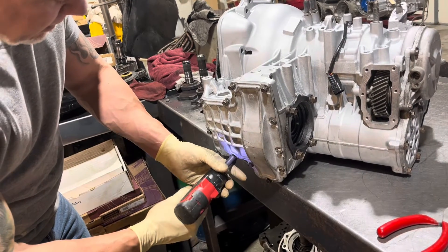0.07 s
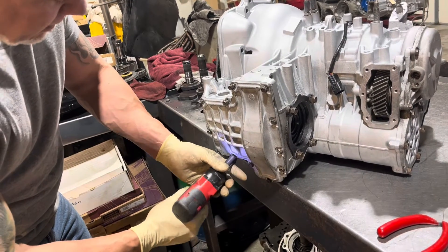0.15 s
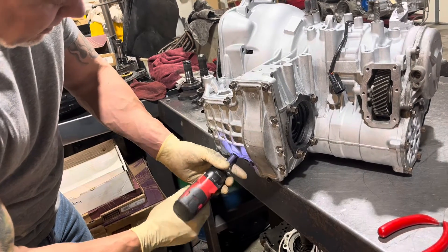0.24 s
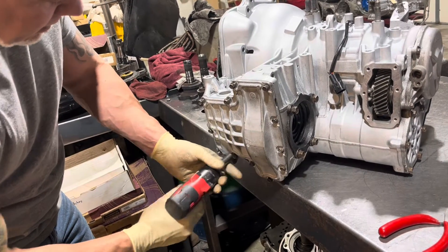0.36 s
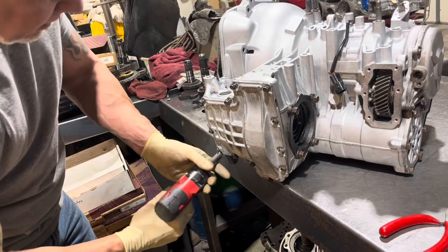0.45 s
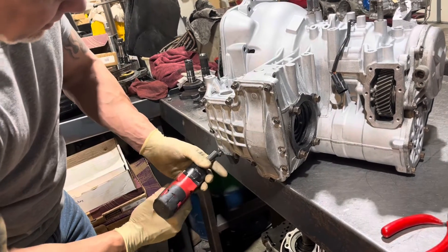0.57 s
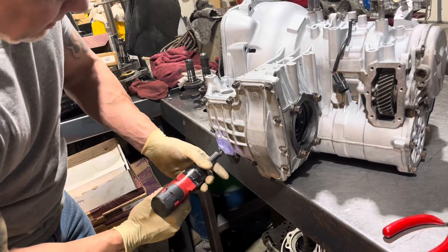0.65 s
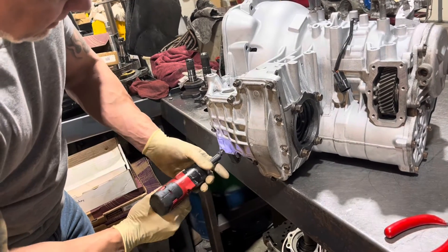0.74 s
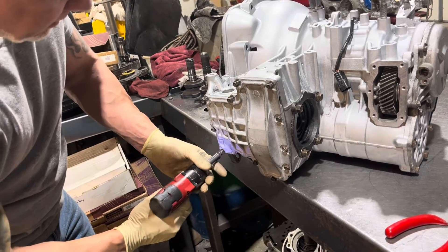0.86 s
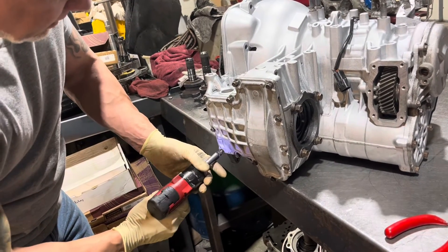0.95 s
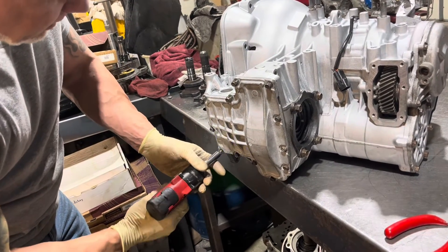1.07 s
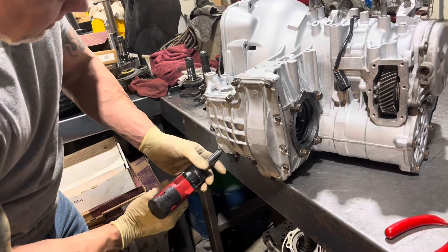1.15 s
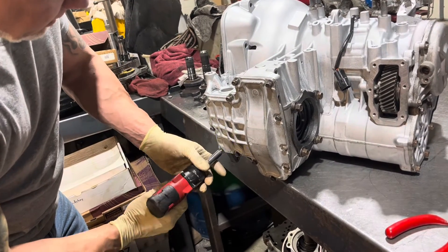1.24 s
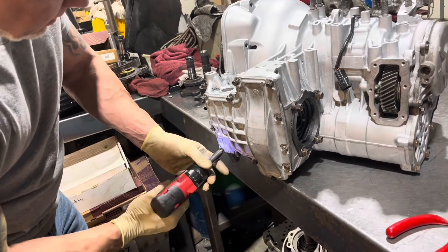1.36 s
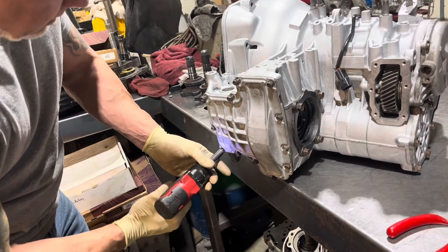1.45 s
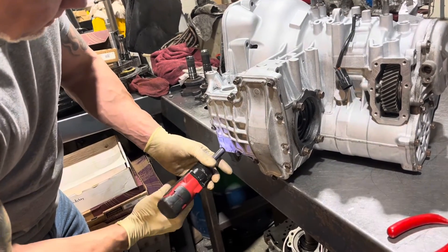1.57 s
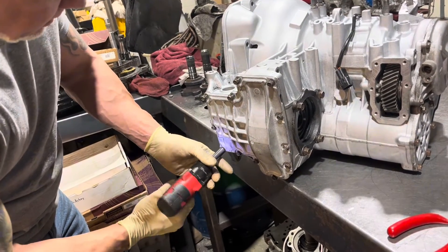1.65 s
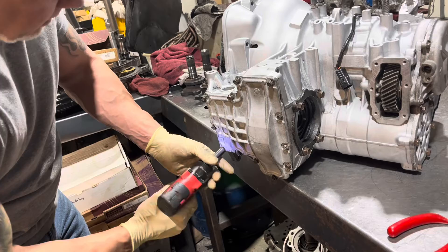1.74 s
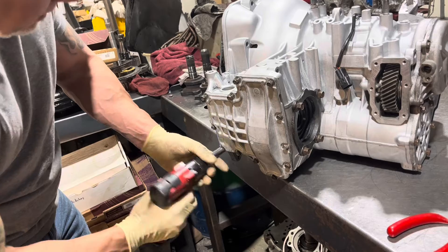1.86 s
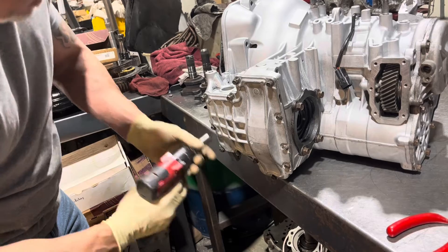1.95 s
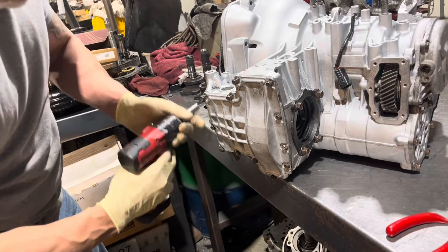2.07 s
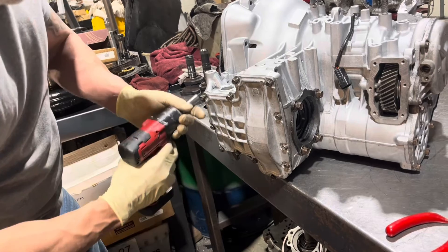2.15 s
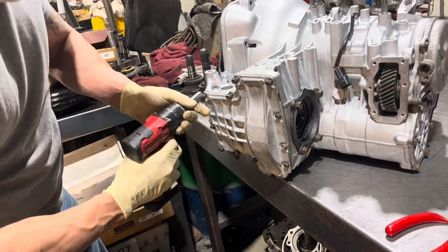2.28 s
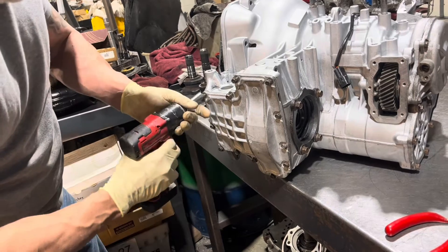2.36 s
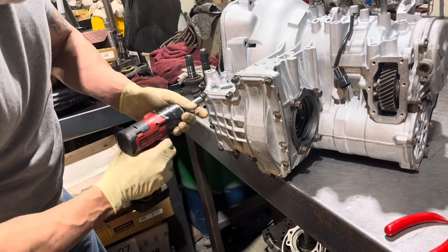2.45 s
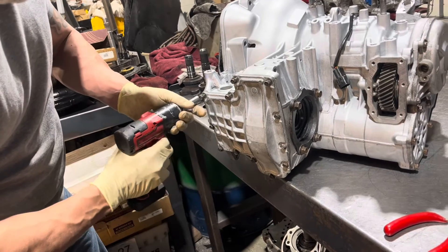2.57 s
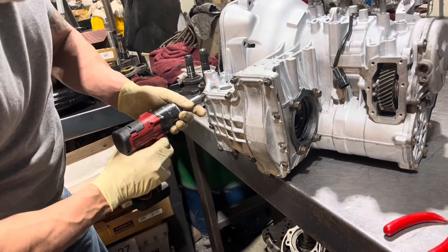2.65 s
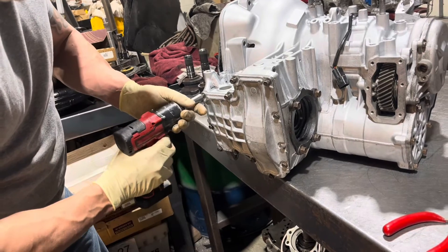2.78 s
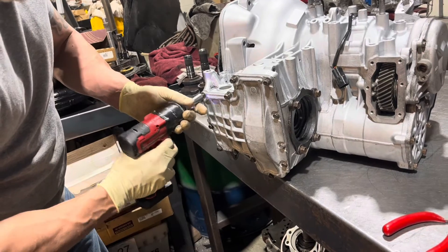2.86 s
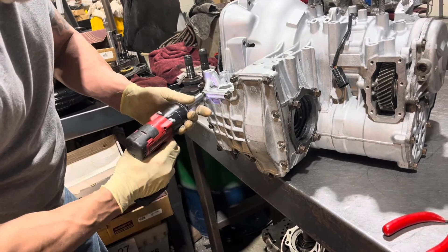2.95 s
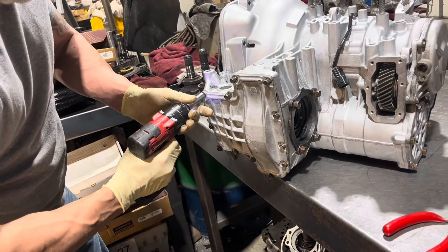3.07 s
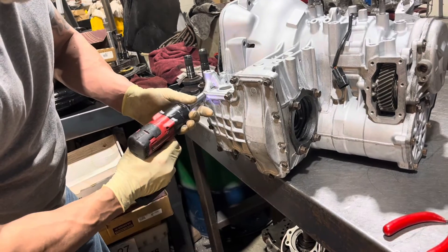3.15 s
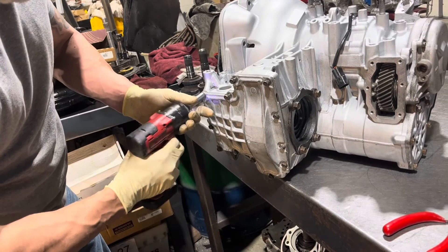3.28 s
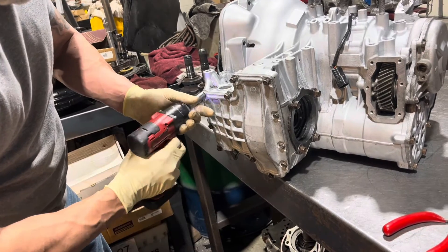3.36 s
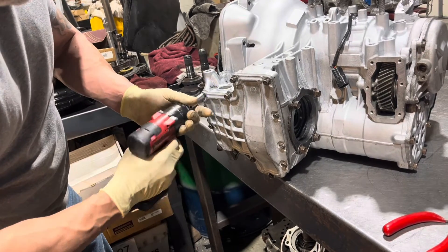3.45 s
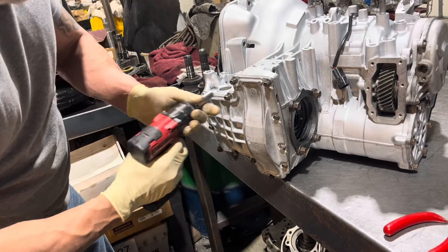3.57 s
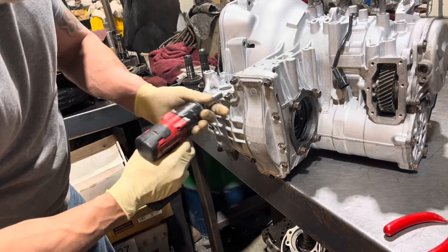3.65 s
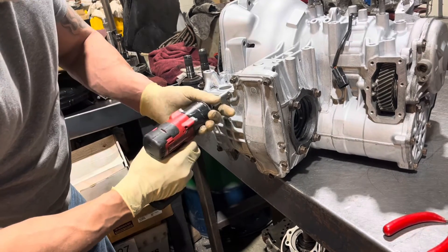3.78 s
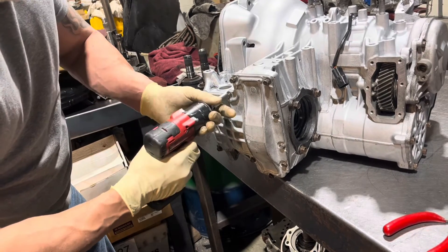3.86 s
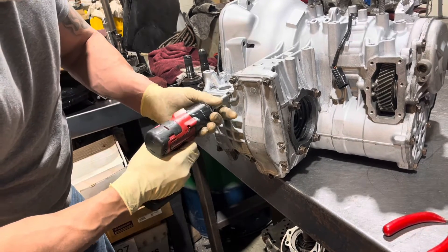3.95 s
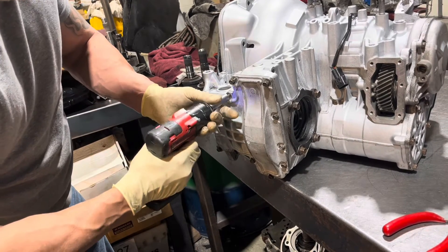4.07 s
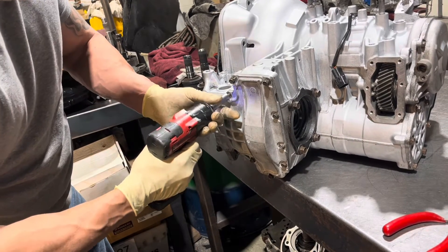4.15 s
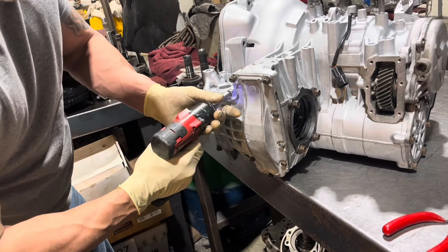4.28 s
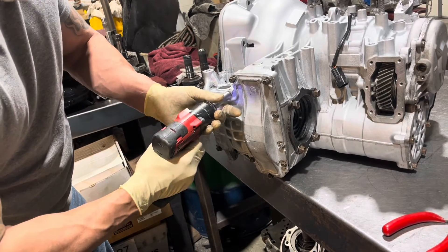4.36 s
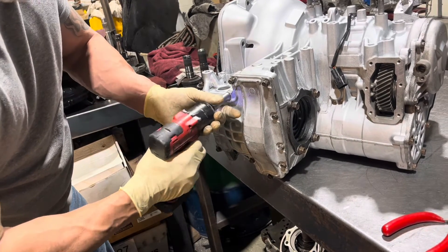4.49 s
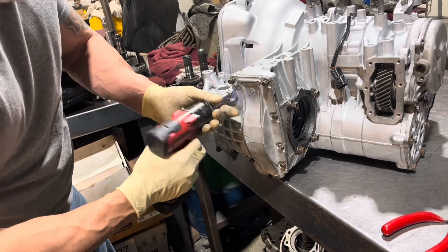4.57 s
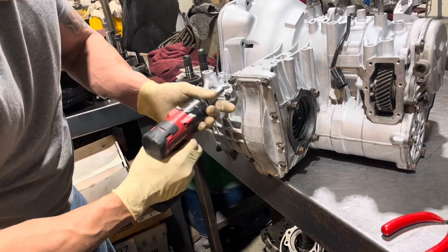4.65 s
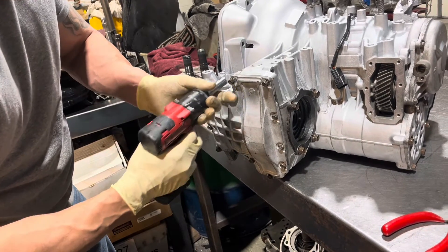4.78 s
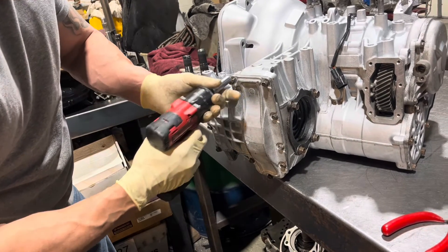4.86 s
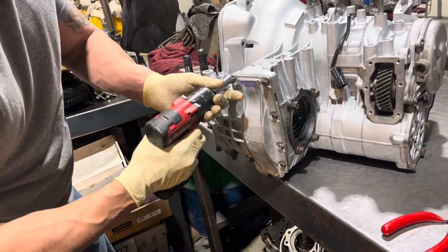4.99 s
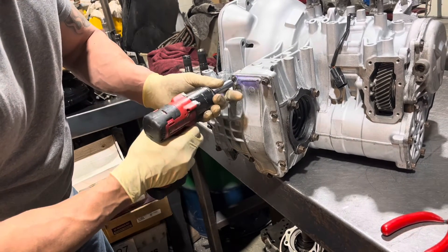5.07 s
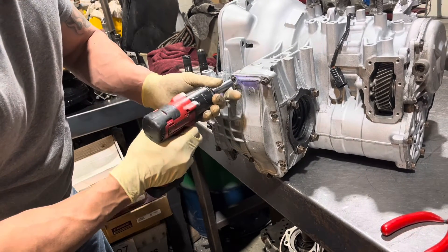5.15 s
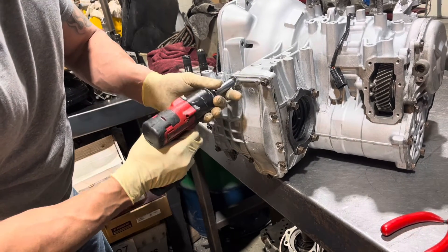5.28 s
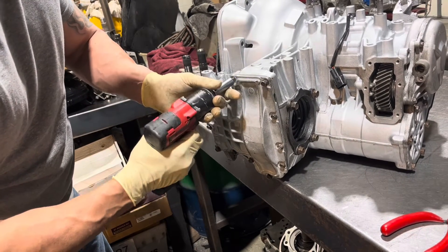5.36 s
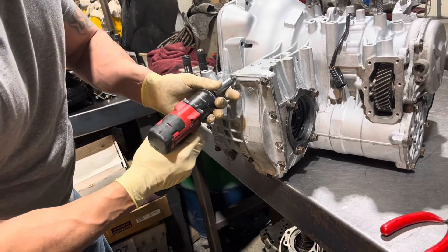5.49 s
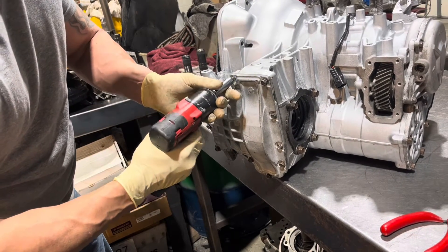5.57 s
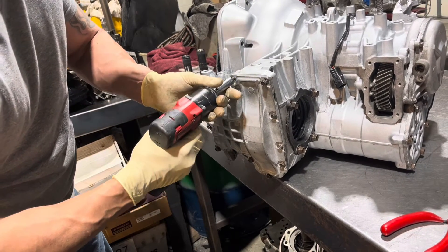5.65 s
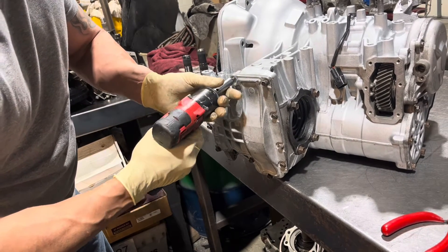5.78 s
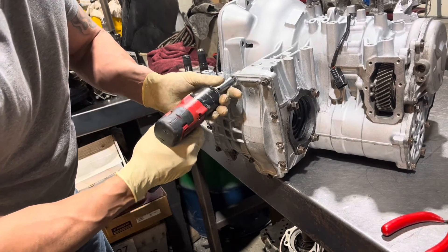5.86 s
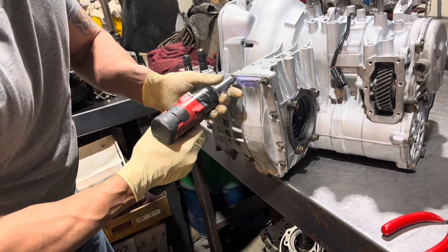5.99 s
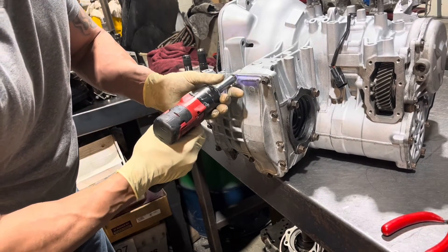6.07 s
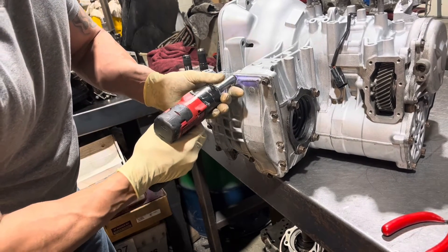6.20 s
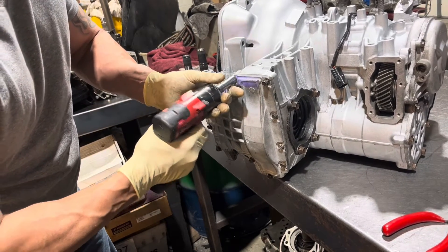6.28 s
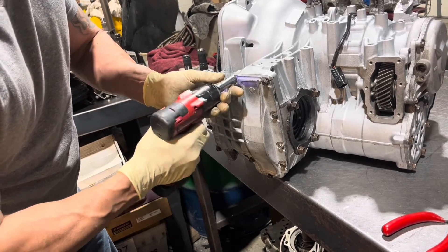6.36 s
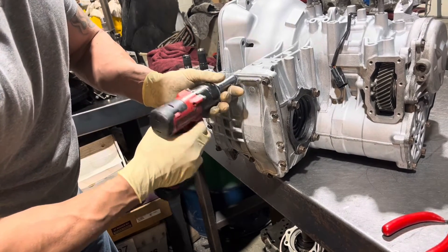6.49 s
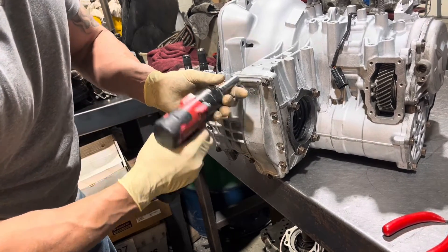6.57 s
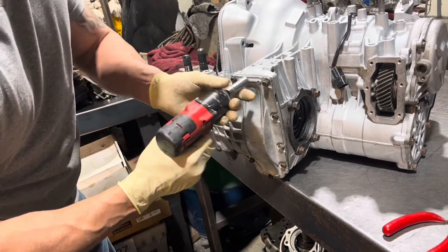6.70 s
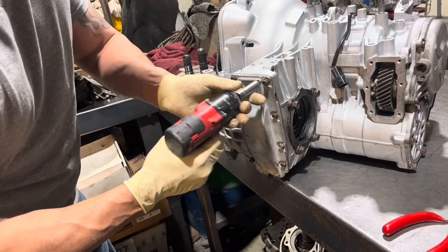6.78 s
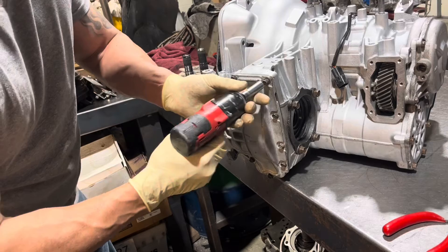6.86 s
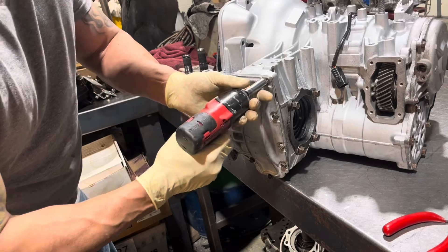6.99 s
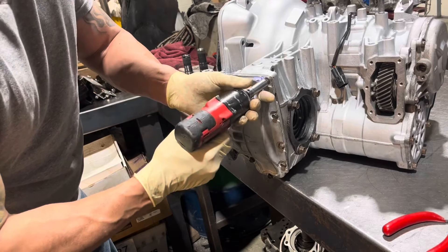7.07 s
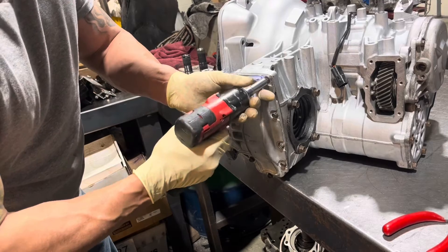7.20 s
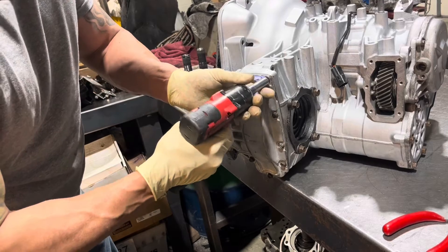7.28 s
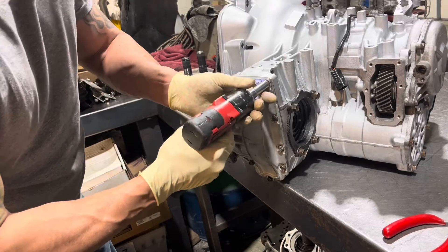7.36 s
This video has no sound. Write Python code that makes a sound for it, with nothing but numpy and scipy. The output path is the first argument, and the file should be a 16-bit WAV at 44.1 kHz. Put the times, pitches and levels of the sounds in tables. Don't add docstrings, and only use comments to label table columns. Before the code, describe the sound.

A battery ratchet is already whining, then rattles hard against a bolt. A softer whir rises and sags, and the tool drives four more bolts, each with a quick spin-up and a burst of fast, sharp metallic knocks that stops abruptly or slows briefly. Steel clicks, a socket rattle, bench thuds and a faint hum of the case fill the gaps. Close, slightly compressed phone pickup in a moderately live shop.

```python
import sys
import numpy as np
from scipy import signal
from scipy.fft import rfft, irfft
from scipy.io import wavfile
from scipy.ndimage import uniform_filter1d

SR = 44100
rng = np.random.default_rng(int(sys.argv[2]) if len(sys.argv) > 2 else 0)


def dump_mix(stems):
    frames = np.atleast_2d(stems).T
    limited = np.clip(frames, -1, 1)
    pcm = np.round(limited * 32767).astype(np.int16)
    wavfile.write(sys.argv[1], SR, pcm)


def volts(x):
    e = np.asarray(x, float) / 20
    return 10 ** e


N = 327663
TIME = np.arange(N) / SR
TOP_HZ = 15850
FULL_HZ = 900

# (time [s], rotor tone [Hz], strain [dB])
PULLED = [
    [(0, 800, -7), (0.105, 816, 2)],
    [(1.315, 200, -24), (1.4, 584, 0.5), (1.425, 745, 6), (1.46, 837, 1.5), (1.57, 910, 1),
     (1.645, 938, -5)],
    [(2.95, 810, -6.5), (3.01, 891, 4.5), (3.06, 949, -4.5), (3.19, 960, -13.5)],
    [(4.095, 220, -27.5), (4.15, 512, 2), (4.18, 789, 0), (4.21, 862, -5.5), (4.26, 934, -9),
     (4.41, 981, 0.5)],
    [(5.95, 220, -20.5), (6.0, 430, 2), (6.04, 597, 7.5), (6.09, 889, -8.5), (6.17, 952, -4),
     (6.265, 988, -7.5)],
]
# (time [s], rotor tone [Hz], strain [dB])
FEATHERED = [
    [(0.69, 200, -14.5), (0.75, 381.3, -2.5), (0.79, 526.5, -1.5), (0.83, 649.4, 0.5), (0.87, 704.2, -1),
     (0.95, 758, -4.5), (1.03, 696.2, -3.5), (1.075, 646.1, -9), (1.125, 582.7, -18)],
    [(2.37, 397.5, -25), (2.42, 598, -16), (2.45, 668, 1.5), (2.53, 468.9, -12), (2.645, 363.5, -7)],
    [(4.995, 203.9, -11), (5.1, 305.4, -2), (5.17, 341.3, 1), (5.27, 339.5, -12.5)],
    [(7.112, 247.7, -14), (7.2, 451.6, -1), (7.25, 544, -3), (7.33, 581.6, -6.5), (7.39, 625, -2),
     (7.43, 675.3, -3)],
]
SPEED = sorted(PULLED + FEATHERED)
# (first blow [s], blow rate [Hz])
BEATS = [
    (0.1164, 36.6),
    (1.6507, 43.6),
    (3.1992, 43.6),
    (4.4132, 43.7),
    (6.2738, 45.0),
]
# (trigger let go after [s], peak [dB], dying [dB/s])
BURSTS = [
    (0.13, -25, 163.5),
    (0.18, -25.5, 897),
    (.17, -24.5, 447.5),
    (0.16, -25.5, 250),
    (0.16, -24, 604),
]


def rms_one(x):
    return x / np.sqrt(np.mean(x ** 2) + 1e-20)


def column(tables, index):
    rows = np.vstack(tables)
    rows = rows[np.argsort(rows[:, 0])]
    return np.interp(TIME, rows[:, 0], rows[:, index])


def running(tables, edge_s):
    on = sum((TIME >= table[0][0]) & (TIME <= table[-1][0]) for table in tables)
    return uniform_filter1d(np.minimum(on, 1.), int(edge_s * SR) + 1, mode="nearest")


def colour(x, spectrum):
    size = 8192
    hz, db = np.transpose(spectrum)
    bins_hz = np.arange(size // 2 + 1) * SR / size
    log_gain = np.interp(np.log(bins_hz + 1), np.log(hz), db) * np.log(10) / 20
    cepstrum = irfft(log_gain)
    cepstrum[1:size // 2] *= 2
    cepstrum[size // 2 + 1:] = 0
    taps = irfft(np.exp(rfft(cepstrum)))[:size // 2]
    return signal.fftconvolve(x, taps / np.sqrt(np.sum(taps ** 2)))[:N]


def band(x, low_hz, high_hz):
    edges_hz = [low_hz, min(high_hz, .45 * SR)]
    return signal.sosfilt(signal.butter(2, edges_hz, "band", fs=SR, output="sos"), x)


def drift(rate_hz):
    r = np.exp(-2 * np.pi * rate_hz / SR)
    slow = signal.lfilter([1], [1, -2 * r, r * r], rng.standard_normal(N + SR))
    return rms_one(slow[SR:])


def strikes(times, levels_db):
    train = np.full(N, 1e-18)
    np.add.at(train, np.round(np.asarray(times) * SR).astype(int), volts(levels_db))
    return train


def bursts(times, levels_db, rise_s, fall_s):
    t = np.arange(SR // 20) / SR
    shape = (1 - np.exp(-t / rise_s)) * np.exp(-t / fall_s)
    envelope = signal.fftconvolve(strikes(times, levels_db), shape / shape.max())[:N]
    return envelope * rng.choice([-1., 1.], N)


def ring(train, hz, t60_s):
    r, w = volts(-60 / (t60_s * SR)), 2 * np.pi * hz / SR
    return signal.lfilter([0, np.sin(w)], [1, -2 * r * np.cos(w), r * r], train)


def shop_air():
    # (frequency [Hz], density [dB per Hz])
    air_colour = [(180, -46.5), (300, -16), (366, -5), (390, -9), (603, -23), (725, -11.5), (1280, -30),
                  (1540, -18.5), (7000, -43.5), (9100, -68.5), (15400, -120)]
    return volts(-86.5) * rms_one(colour(rng.standard_normal(N), air_colour))


def workshop(x, gap_s=0.00069):
    # (low [Hz], high [Hz], t60 [s], level [dB])
    room_bands = [(287, 2320, 0.6, -5.5), (1230, 5900, 0.96, -27), (3170, 5800, 0.878, -6.5),
                  (6350, 10700, 0.601, -5.5), (11570, 16500, .4, -19)]
    t = TIME[:SR]
    tail = 0
    for low_hz, high_hz, t60_s, db in room_bands:
        tail = tail + volts(db - 41 - 60 * t / t60_s) * band(rng.standard_normal(SR), low_hz, high_hz)
    return signal.fftconvolve(x, tail * np.minimum(t / gap_s, 1))[:N]


def bench_rumble():
    # (time [s], level [dB])
    rumble_levels = [(0, -67.5), (.33, -90), (.6, -81.5), (1.4, -77), (1.66, -63.5), (2.0, -77),
                     (3.27, -69.5), (3.45, -78.5), (3.62, -67.5), (4.1, -82.5), (4.45, -69), (5.13, -83),
                     (5.5, -89.5), (5.92, -75.5), (6.5, -68.5), (6.75, -72.5), (7.06, -78), (7.43, -83.5)]
    # (frequency [Hz], density [dB per Hz])
    rumble_colour = [(12, -33), (20, -4), (101, 3.5), (147, -4), (174, 0), (354, -12), (600, -9.5),
                     (780, -57), (1320, -120)]
    rumble = rms_one(colour(rng.standard_normal(N), rumble_colour)) * volts(3 * drift(12))
    return band(rumble * volts(column([rumble_levels], index=1) + 5), 40, 330)


def bench_thuds(cycles=4.0):
    # (time [s], peak [dB], pitch [Hz])
    thud_events = [(0.511, -49.5, 164), (1.717, -46.5, 54), (2.272, -53.5, 96), (2.717, -56, 138),
                   (3.392, -61, 148), (3.555, -38.5, 157), (3.584, -48, 131), (3.606, -43.5, 201),
                   (3.634, -47, 143.4), (3.654, -50.5, 109), (3.799, -62.5, 105), (3.922, -56.5, 69),
                   (4.821, -63, 70.0), (4.887, -57, 91.5), (4.938, -64.5, 133), (6.435, -39, 101.5),
                   (6.575, -46, 157), (6.63, -43, 210), (6.65, -60, 129)]
    thuds = 0
    for s, db, hz in thud_events:
        thuds = thuds + band(ring(strikes([s], db + 10), hz, cycles / hz), 0.67 * hz, 2.3 * hz)
    s, db, _ = np.transpose(thud_events)
    shudder = band(bursts(s, db + 6, rise_s=0.0018, fall_s=.022), 120, 370)
    return thuds + shudder


def case_hum():
    # (time [s], level [dB], pitch [Hz], t60 [s])
    hum_events = [
        (3.5, -83.5, 730, 1.1),
        (3.56, -66.5, 760, 0.81),
        (6.47, -69, 500, 0.5),
        (6.57, -72, 752, 2.03),
    ]
    hums = 0
    for s, db, hz, t60_s in hum_events:
        hums = hums + band(ring(strikes([s], db), hz, t60_s), .9 * hz, 1.1 * hz)
    return hums * volts(2 * drift(20))


def socket():
    # (time [s], peak [dB], treble [dB], body below 1 kHz [dB])
    clicks = [(0.5632, -50.5, -12.5, -10), (1.076, -40.5, -24, -19), (1.118, -42, -35, -11.5),
              (2.2389, -42.5, -20, -19), (2.343, -59.5, -38, -5.5), (2.7372, -54, -39, -7),
              (2.8608, -48, -8, -23.5), (3.5573, -45, -11, -30), (3.728, -50.5, -6, -9),
              (3.8777, -60.5, -12.5, -4), (3.9219, -44.5, -13, -13), (3.9902, -52.5, -14, -11.5),
              (4.006, -66, -1, -13), (4.8647, -43.5, -7, -7), (5.0521, -44.5, -2, -11.5),
              (5.242, -43, -28, -14.5), (5.546, -70.5, -19, -27), (5.8015, -51.5, -8, -4.5),
              (5.8331, -56.5, -13, 0.5), (6.9334, -48, -9, -8), (6.9775, -58.5, -13, -10),
              (7.1699, -37.5, -1.5, -19)]
    # (time [s], peak [dB], treble [dB], body below 1 kHz [dB])
    rattle = [
        (2.8854, -28, -14, -18),
        (2.8934, -30, 0, -18),
        (2.9122, -32.5, -22.5, -14),
        (2.9247, -24.5, -16.5, -26),
        (2.9344, -34, -8.5, -21.5),
        (2.9487, -26, -11, -17.5),
    ]
    # (time [s], peak [dB], treble [dB])
    take_up = [(0.6953, -52.5, -10.5), (0.704, -54, -1.5), (1.362, -43, -31), (1.3957, -48, -6),
               (2.3725, -69, 15), (4.119, -50.5, 2), (4.1475, -45, -6.5), (4.9974, -48.5, -25),
               (5.953, -64.5, -8.5), (5.9877, -43, -33), (7.1176, -64, -23), (7.2045, -42.5, -25)]
    ticks = [(*row, -16) for row in take_up]
    s, db, treble_db, body_db = np.transpose(clicks + rattle + ticks)
    mid = band(bursts(s, db - 1, rise_s=0.00012, fall_s=0.012), 820, 3000)
    treble = band(bursts(s, db + treble_db + 0.5, rise_s=0.00024, fall_s=0.0042), 3500, 10000)
    body = band(bursts(s, db + body_db + 11.5, rise_s=0.001, fall_s=0.013), 330, 730)
    return mid + treble + body


def squeeze_levels():
    # (grind [dB], rotor whine [dB], gear mesh [dB], hiss above grind [dB])
    squeezes = [
        (-50.5, -66, -67.5, -3.5),
        (-52.5, -73.5, -59.5, -1.5),
        (-50, -75, -59.5, -3),
        (-50, -70, -82, -5.5),
        (-49.5, -67, -59.5, -1.5),
        (-52.5, -68.5, -70.5, 1),
        (-48, -78.5, -61, -3),
        (-49, -76.5, -62, -2),
        (-48, -69.5, -55, -1.3),
    ]
    ends_s = [table[-1][0] + .05 for table in SPEED[:-1]]
    return np.array(squeezes)[np.searchsorted(ends_s, TIME)].T


def rotor():
    return uniform_filter1d(column(SPEED, index=1), SR // 40, mode="nearest")


def whine(wobble=.003, flutter_db=3.5):
    # (multiple of rotor tone, level [dB])
    partials = [(1, -17), (2, -3.5), (3, -11.5), (4, -1), (5, -13.5), (6, -5.5), (9, -10)]
    # (frequency [Hz], width [Hz], lift [dB])
    housing = [(1060, 300, 10), (1900, 200, 5), (2280, 350, 10), (2850, 500, 9), (3380, 200, 8),
               (4300, 250, 6), (5400, 2200, -6)]
    rotor_hz = rotor()
    octaves = np.log2(rotor_hz / FULL_HZ)
    turns = np.cumsum(rotor_hz * (1 + wobble * drift(90) + wobble * drift(25))) / SR
    speeding_up = uniform_filter1d(np.gradient(rotor_hz) * SR, SR // 50)
    surge = np.clip(speeding_up / 4000, 0, 1)
    _, whine_db, mesh_db, _ = squeeze_levels()

    mesh_db = mesh_db + 14 * octaves - 7 * surge + .5 * flutter_db * drift(30)
    tones = volts(mesh_db) * np.sin(2 * np.pi * 3.38 * turns)
    whine_db = whine_db + 3 * octaves - 2 * surge
    cogging_db = .04 * np.clip(500 - rotor_hz, 0, 200) * (1 - surge)
    for multiple, partial_db in partials:
        k = np.round(multiple)
        lift_db = sum(peak_db / (1 + (2 * (k * rotor_hz - hz) / width_hz) ** 2)
                      for hz, width_hz, peak_db in housing)
        dropout_db = np.minimum(4 * drift(25) + surge * 8 * drift(70), 2)
        roughness_db = (.4 * k + 3 * surge) * drift(200)
        level_db = whine_db + partial_db + lift_db + dropout_db + roughness_db + cogging_db * (k > 4)
        tones = tones + volts(level_db) * np.sin(2 * np.pi * k * turns)
    strain_db = column(SPEED, index=2) + 12
    return tones * volts(strain_db) * running(SPEED, edge_s=0.028)


def load():
    gain = 0
    for (s, _), (hold_s, db, dying_db) in zip(BEATS, BURSTS):
        t = TIME - s + .014
        swell_db = 5 * np.sin(.7 * np.pi * np.clip(t / hold_s, 0, 1))
        fade_db = 0.93 * dying_db * np.maximum(t - hold_s, 0)
        gain = gain + (t > 0) * volts(db - 18.5 + swell_db - fade_db)
    return uniform_filter1d(gain, SR // 100)


def grind(grain_db=3.0, split_hz=6500):
    # (frequency [Hz], density [dB per Hz])
    grind_colour = [(120, -32.5), (200, -17.5), (1570, -6.5), (1850, -2.5), (2860, -1.5), (3830, -5.5),
                    (4520, -6), (5420, -3.5), (6160, -12), (8870, 1.5), (11700, -10.5), (12800, -54.5),
                    (14000, -14.5), (15600, -6.5)]
    noise = colour(rng.standard_normal(N) * volts(grain_db * drift(450)), grind_colour)
    noise = signal.sosfilt(signal.ellip(8, .5, 60, TOP_HZ, fs=SR, output="sos"), noise)
    low = rms_one(band(noise, 92, split_hz))
    high = signal.sosfilt(signal.butter(2, 0.53 * split_hz, "high", fs=SR, output="sos"), noise)
    hiss = volts(2.1 * drift(40)) * rms_one(high)
    thrum = volts(-11 + 3 * drift(32)) * rms_one(band(rng.standard_normal(N), 330, 1100))

    grind_db, _, _, hiss_db = squeeze_levels()
    free_db = grind_db + 9 * np.log2(rotor() / FULL_HZ)
    free = volts(free_db) * running(SPEED, edge_s=0.03)
    return free * (low + volts(hiss_db) * hiss) + load() * (low + volts(-6) * hiss + thrum)


def blows(count=13):
    # (time [s], peak [dB], treble [dB])
    jolts = [(0.1083, -17.5, -20), (0.1368, -26.5, -11), (0.1651, -21, -14.5), (0.1925, -25.5, -11.5),
             (0.248, -19, -10), (0.266, -38, -16.5), (0.2935, -27, -4.5), (1.6677, -36.5, -1),
             (1.8278, -28, -8), (2.8958, -42.5, -16.5), (2.9075, -25, -11), (2.9216, -21.5, -11),
             (2.9443, -29, -0.5), (2.9842, -32, -21.5), (3.2338, -24.5, -17.5), (3.3906, -28, -1),
             (4.5453, -26, -9.5), (4.5779, -28, 2.5), (4.6103, -29, -1.5), (4.6298, -32, -2),
             (6.2622, -33.5, -4.5), (6.3763, -37.5, -15.5), (6.4268, -32.5, -13)]
    # (place [cycles], level [dB], tightening gain [dB/s], treble [dB])
    cycle = [
        (0, 0, 0, -3),
        (-.26, -10, 45, -13),
        (.37, -21, 90, -12),
        (.56, -24, 105, -15),
    ]
    rows = [jolts]
    for (s, rate_hz), (hold_s, db, dying_db) in zip(BEATS, BURSTS):
        for n, (place, contact_db, tighten_db, treble_db) in enumerate(cycle):
            level_scatter_db, time_scatter_s = (-5.06, .0015) if n else (-2.53, .0004)
            chance = np.clip(rng.standard_normal((count, 3)), -2, 2).T
            t = (np.arange(count) + place) / rate_hz
            coast_s = np.maximum(t - hold_s, 0)
            level_db = db + np.minimum(contact_db + tighten_db * t, 2) - dying_db * coast_s
            level_db = level_db + level_scatter_db * chance[0]
            late_s = 0.63 * rate_hz * coast_s ** 2 / 10 + time_scatter_s * chance[1]
            contacts = np.transpose([s + t + late_s, level_db, treble_db - 3 * chance[2]])
            rows.append(contacts[t >= 0])
    return np.vstack(rows).T


def hammer():
    # (frequency [Hz], density [dB per Hz])
    blow_colour = [(88, -53), (150, -16), (560, -19.5), (814, -10.5), (1620, -6), (2180, 2.5), (2870, -4.5),
                   (5380, -2.5), (6680, -11), (9150, -10.5), (12800, -28.5), (15300, -16.5), (16500, -43.5)]
    # (frequency [Hz], level [dB])
    case_modes = [(1900, -54.5), (2300, -51), (3500, -48.5), (5100, -50.5)]
    s, db, treble_db = blows()
    crack = bursts(s, db - 0.5, rise_s=0.00024, fall_s=.0016)
    crack = band(colour(crack, blow_colour), 110, 4300)
    treble = bursts(s, db + treble_db + 4.5, rise_s=0.00061, fall_s=.001)
    treble = band(colour(treble, blow_colour), 7100, 11000)
    edge = bursts(s, db + treble_db + 9, rise_s=0.00018, fall_s=.001)
    edge = band(colour(edge, blow_colour), 10170, 16500)
    case = 0
    for hz, mode_db in case_modes:
        chance_db = 4.5 * np.tanh(rng.standard_normal(len(s)))
        case = case + ring(strikes(s, db + mode_db + 33 + chance_db), hz, t60_s=.016)
    return crack + treble + edge + case


def scene():
    tool = socket() + whine() + grind() + hammer()
    bench = bench_rumble() + bench_thuds() + case_hum()
    return (shop_air() + workshop(tool) + bench + tool)[None]


def roll_off(x):
    return signal.sosfilt(signal.butter(12, 17160, fs=SR, output="sos"), x)


def record(dry):
    limit = .13
    limited = limit * np.tanh(dry / limit)
    mix = signal.sosfilt(signal.cheby2(12, 60, 1.09 * TOP_HZ, fs=SR, output="sos"), limited)
    return roll_off(mix)


dry = scene()
out = record(dry)
dump_mix(out)
```